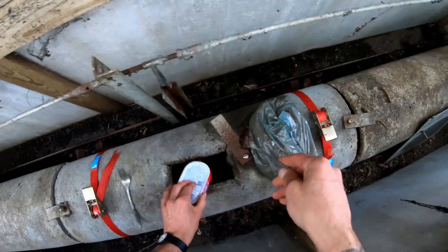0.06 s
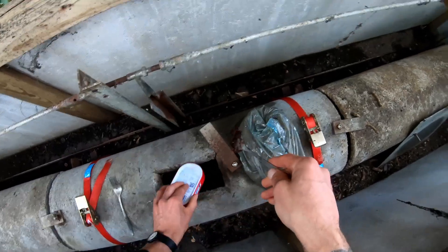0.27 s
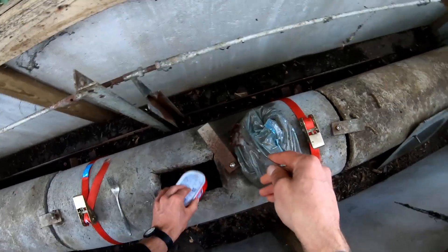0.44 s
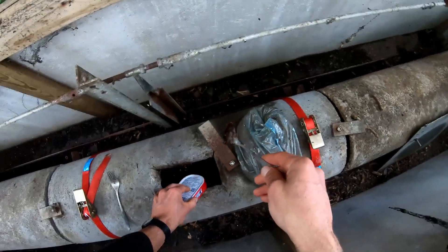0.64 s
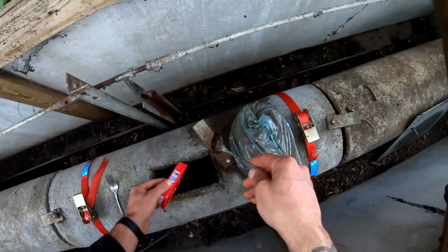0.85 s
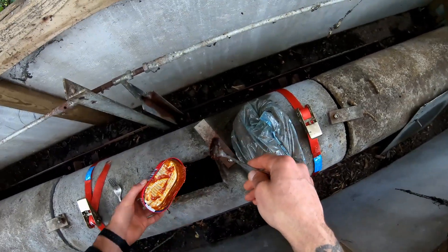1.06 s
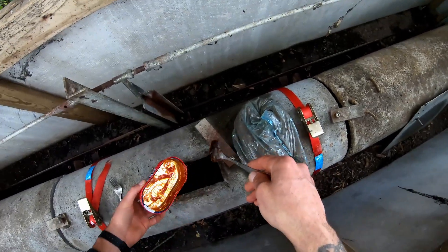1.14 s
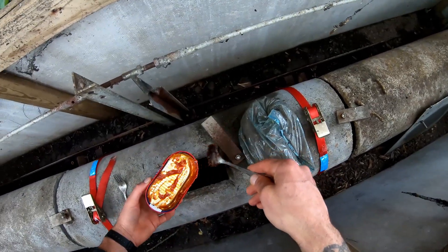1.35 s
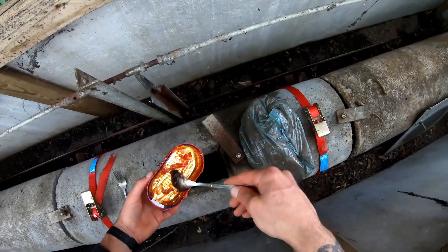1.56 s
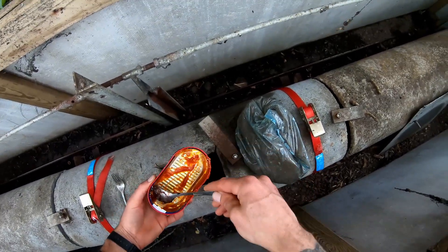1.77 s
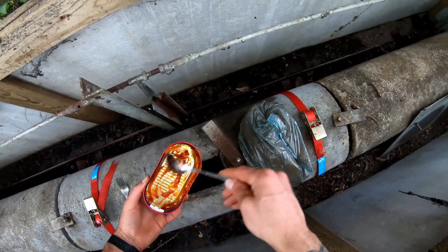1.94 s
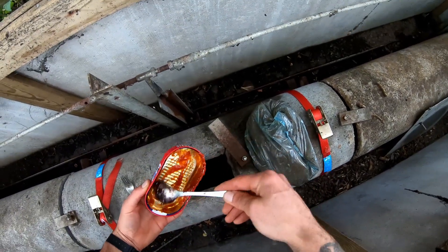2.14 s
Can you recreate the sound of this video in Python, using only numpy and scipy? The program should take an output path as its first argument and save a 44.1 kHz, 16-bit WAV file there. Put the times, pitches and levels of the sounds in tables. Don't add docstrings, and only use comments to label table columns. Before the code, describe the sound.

An empty metal tin knocks four times on a hollow pipe, then a spoon scrapes it

```python
import sys
import numpy as np
from scipy import signal
from scipy.fft import rfft, irfft
from scipy.io import wavfile
from scipy.ndimage import uniform_filter1d

SR = 44100
rng = np.random.default_rng(int(sys.argv[2]) if len(sys.argv) > 2 else 0)


def invert_db(x):
    u = np.asarray(x, float) / 20
    return 10 ** u


def transcribe(signal):
    frames = np.atleast_2d(signal).T
    limited = np.clip(frames, -1, 1)
    pcm = np.round(limited * 32767).astype(np.int16)
    wavfile.write(sys.argv[1], SR, pcm)


N = 97020

# start in seconds, rib level in dB, bowl level in dB.
RIB_DROPS = [(1.8427, -32.5, -34.5), (1.8534, -27.5, -38), (1.8623, -26, -36), (1.8704, -27.5, -38),
             (1.8781, -28.5, -31), (1.8857, -27, -40), (1.8928, -23, -31), (1.8985, -26, -28.5),
             (1.9042, -17, -20), (1.9097, -34, -22.5), (1.915, -23, -29), (1.9203, -38, -31),
             (1.926, -41, -36), (1.933, -36, -30.5), (1.938, -43, -35), (1.9424, -46, -48),
             (1.949, -50, -55)]


def evened(x):
    return x / np.sqrt(np.mean(x ** 2) + 1e-20)


def read(points, hz):
    f, value = np.transpose(points)
    return np.interp(np.log(hz + 1), np.log(f + 1), value)


def add(mix, s, sound):
    at = round(s * SR)
    sound = sound[max(-at, 0):]
    part = mix[max(at, 0):][:len(sound)]
    part += sound[:len(part)]


def coloured(x, points):
    hz = np.fft.rfftfreq(len(x), 1 / SR)
    below = hz < 0.7 * points[0][0]
    gain = invert_db(read(points, hz) - 60 * below)
    return evened(irfft(rfft(x) * gain, len(x)))


def ring(modes, t):
    hz, db, t60 = np.transpose(modes)[:, :, None]
    level = invert_db(db - 60 * t / np.maximum(t60, 0.003))
    return (level * np.sin(2 * np.pi * hz * t)).sum(0)


def onset(t, rise_s):
    return np.minimum(t / rise_s, 1)


def stilled(t, gap, fall_s):
    return np.exp(-np.maximum(t - gap, 0) / fall_s)


def hiss():
    # frequency in Hz, level in dB.
    hiss_colour = [(100, -0.5), (370, -1), (600, -6), (1600, -14), (5000, -15.5), (9000, -17.5),
                   (13000, -21), (16500, -35)]
    a, b, patches = rng.standard_normal((N // 256 + 5, 513, 3)).T
    patches = uniform_filter1d(patches, size=10, axis=0)
    patches = evened(uniform_filter1d(patches, size=10, axis=1))
    noise = signal.istft((a + 1j * b) * invert_db(patches), nperseg=1024, noverlap=768)[1][:N]
    return invert_db(-55.5) * coloured(noise, hiss_colour)


def wind():
    # time in seconds, level in dB.
    gusts = [(0.0, -32.5), (0.02, -40.5), (0.21, -48.5), (0.37, -45.5), (0.48, -46.5), (0.62, -43.5),
             (0.69, -51), (1.3, -47), (1.33, -56), (1.6, -43), (1.65, -55), (1.71, -43.5), (1.87, -45),
             (1.94, -35.5), (2.02, -54.5), (2.2, -34)]
    # frequency in Hz, level in dB.
    wind_colour = [(7.1, -38), (12, 7), (56, -1.5), (182, -21.5), (221, -40), (248, -38), (600, -31.5),
                   (780, -77), (1320, -120)]
    s, db = np.transpose(gusts)
    strength = uniform_filter1d(np.interp(np.arange(N) / SR, s, db), size=3000)
    return coloured(rng.standard_normal(N), wind_colour) * invert_db(strength)


def yard(x):
    echo_t60 = 0.15
    taps = np.zeros(SR // 4)
    at = np.arange(120, SR // 4 - 20, 20)
    taps[at + rng.integers(0, 20, len(at))] = rng.choice([-1., 1.], len(at))
    decay = invert_db(-60 * np.arange(SR // 4) / SR / echo_t60)
    taps = signal.lfilter([1], [1, -0.5], taps * decay)
    return signal.fftconvolve(x, taps / np.linalg.norm(taps))[:N]


def slides():
    # start in seconds, length in seconds, level in dB, centre in Hz.
    brushes = [
        (-.05, 0.24, -49.5, 368),
        (0.236, .01, -49, 1500),
        (0.238, 0.026, -47, 4880),
        (1.661, 0.053, -52, 2530),
        (1.761, 0.25, -55, 1750),
        (1.96, 0.098, -60.5, 1480),
    ]
    out, t = np.zeros(N), np.arange(8000) / SR
    for s, length, db, hz in brushes:
        a, b = rng.standard_normal((2, 8000))
        grains = a * invert_db(13.0 * uniform_filter1d(b, size=60))
        grains = coloured(grains, [(hz / 5, -14), (hz, 0), (hz * 5, -15), (22000, -30)])
        stroke = np.sin(np.pi * onset(t, length) ** 0.39)
        add(out, s, invert_db(db) * grains * stroke)
    return out


def grit():
    # frequency in Hz, level in dB.
    grit_colour = [(530, -55), (900, -15), (1700, -1), (2400, -4), (3470, -10), (4520, -15.5), (11000, -16),
                   (16000, -17)]
    grain_db = 9 * uniform_filter1d(rng.standard_normal(N), size=30)
    return coloured(rng.standard_normal(N) * invert_db(grain_db), grit_colour)


def spoon_tap(rough):
    # frequency in Hz, level in dB, t60 in seconds.
    held_modes = [(460, -1, 0.028), (944, -10, 0.04), (1408, 2, 0.04), (1660, -1, 0.035), (2300, -3, 0.022),
                  (2912, 4, 0.028), (3620, -7, .03), (4500, -4, .014), (5250, 0, 0.016), (5980, -16, .025),
                  (8000, -16, .02), (8570, -16, .02)]
    tap_s, tap_db, fizz_db = 1.6538, -22.5, -6
    out, t = np.zeros(N), np.arange(3000) / SR
    tap = invert_db(tap_db - 7.5) * ring(held_modes, t) * onset(t, 0.0021)
    fizz = invert_db(tap_db + fizz_db - 60 * t / 0.037 - 3) * onset(t, 0.00068) * rough[:3000]
    add(out, tap_s, tap + fizz)
    add(out, 1.665, invert_db(-16) * tap)
    return out


def rib_ticks():
    # frequency in Hz, level in dB, t60 in seconds.
    rib_modes = [(1240, -7, 0.03), (1390, 2, 0.07), (1620, -8, .04), (430, -9, 0.05), (8700, -19, .015),
                 (10600, -21, .015)]
    # frequency in Hz, level in dB, t60 in seconds.
    bowl_modes = [(172, -12, 0.043), (371, -3, 0.039), (700, -6.5, 0.027), (932, -10.5, 0.048),
                  (2270, -1.5, 0.027), (2917, -6.5, 0.032), (1844, -7, 0.033)]
    out, t = np.zeros(N), np.arange(3000) / SR
    soft = 1 - np.exp(-t / 0.00076)
    gaps = np.diff([row[0] for row in RIB_DROPS], append=2)
    for (s, rib_db, bowl_db), gap in zip(RIB_DROPS, gaps):
        rib = stilled(t, gap, 0.0008) * invert_db(rib_db) * ring(rib_modes, t)
        add(out, s, soft * (rib + invert_db(bowl_db) * ring(bowl_modes, t)))
    return out


def rib_scrape(rough):
    # time in seconds, grit level in dB.
    pressure = [
        (1.84, -53),
        (1.853, -40.5),
        (1.874, -38),
        (1.889, -33.5),
        (1.904, -27.5),
        (1.918, -26),
        (1.933, -35.5),
        (1.943, -41),
        (1.962, -69),
    ]
    out = np.zeros(N)
    s, db = np.transpose(pressure)
    time = np.arange(s[0], s[-1], 1 / SR)
    drops = np.array([row[0] for row in RIB_DROPS])
    last = np.maximum(np.searchsorted(drops, time) - 1, 0)
    flare = np.exp(-abs(time - drops[last]) / 0.002)
    level = invert_db(np.interp(time, s, db))
    add(out, s[0], (0.7 + flare) * level * rough[9000:][:len(time)])
    return out


def spoon():
    rough = grit()
    return spoon_tap(rough) + rib_ticks() + rib_scrape(rough)


def pipe_hums():
    # frequency in Hz, level in dB, t60 in seconds.
    pipe_modes = [(185, -35, .4), (275, -34, .1)]
    # start in seconds, level in dB, length in seconds.
    hums = [
        (.114, 4.5, 0.11),
        (.279, -2.5, 0.15),
        (.426, 1.5, 0.12),
        (.538, 0.5, 0.14),
    ]
    out, t = np.zeros(N), np.arange(SR // 5) / SR
    hum = ring(pipe_modes, t) * onset(t, 0.0033)
    for s, db, length in hums:
        add(out, s, invert_db(db) * hum * np.clip((length - t) / 0.018, 0, 1))
    return out


def thuds():
    # start in seconds, level in dB, frequency in Hz.
    landings = [
        (.127, -18.5, 545),
        (.299, -28.5, 460),
        (0.443, -22.5, 460),
        (.555, -16, 580),
    ]
    out, t = np.zeros(N), np.arange(SR // 5) / SR
    t60 = 0.031
    for s, db, hz in landings:
        thud = ring([(hz, db, t60), (hz * 1.07, db - 11, t60)], t)
        add(out, s, thud * onset(t, 0.0026))
    return out


def singing_lines():
    # frequency in Hz, level in dB, t60 in seconds.
    first_set = [(1326, 0, .4), (1832, 0, .45), (1120, -4, .3)]
    second_set = [(1392, -3, .4), (1676, 0, .35)]
    low_set = [(810, 0, 1.)]
    # start in seconds, then the first, second and low set in dB.
    wakings = [
        (.114, -40, -50, -60),
        (.279, -46, -41, -45),
        (.426, -51, -38, -47),
        (.538, -56, -47, -50),
    ]
    out, t = np.zeros(N), np.arange(SR // 4) / SR
    gaps = np.diff([row[0] for row in wakings], append=1)
    for (s, *levels), gap in zip(wakings, gaps):
        sets = zip(levels, (first_set, second_set, low_set))
        lines = sum(invert_db(db) * ring(modes, t) for db, modes in sets)
        add(out, s, lines * onset(t, 0.0015) * stilled(t, gap, 0.0022))
    return out


def struck_patches():
    # start in seconds, level in dB, frequency in Hz, t60 in seconds.
    patch_blows = [(.1137, -11.5, 1077, .03), (0.1135, -12.5, 1230, 0.025), (0.1152, -18, 1710, 0.039),
                   (.1145, -18, 1927, 0.039), (0.1138, -10, 4020, .015), (.116, -22, 2270, 0.036),
                   (0.118, -20.5, 2800, 0.043), (.117, -22.5, 3290, 0.045), (.129, -24, 1134, .04),
                   (.131, -19.5, 1517, 0.034), (.2785, -12.5, 1134, 0.029), (.2785, -16.5, 2193, 0.054),
                   (.2795, -19, 2055, .045), (0.2781, -25, 280, .05), (.281, -16, 1692, 0.057),
                   (.540, -18.5, 1677, 0.052), (.301, -15, 1746, 0.028), (0.425, -25, 318, 0.054),
                   (.4247, -26.5, 630, 0.038), (.445, -21, 1090, 0.049), (.538, -26, 645, 0.043),
                   (.572, -28.5, 1410, 0.06)]
    out, t = np.zeros(N), np.arange(SR // 4) / SR
    for s, db, hz, t60 in patch_blows:
        add(out, s, onset(t, 0.0006) * ring([(hz, db, t60)], t))
    return out


def side_wall():
    wall_hz = [3760, 4340, 5420, 6230, 6700, 7000, 7220, 8080, 8770, 10050, 11000, 11650]
    # level in dB, t60 in seconds.
    wall_modes = [(0, .034), (-2, .036), (-2, .03), (-5, .024), (-3, .026), (-6, .024), (-7, .03),
                  (-2, .026), (-5, .024), (-8, .024), (-10, .02), (-11, .02)]
    # start in seconds, level in dB, lowest mode in dB, second mode in dB.
    wall_blows = [
        (.1137, -27, -3, 0),
        (.1285, -33, -3, 0),
        (.2785, -21, 2, -5),
        (.2976, -32, -3, 0),
        (.4250, -19, -3, 1),
        (.5380, -25, -2, 1),
    ]
    out, t = np.zeros(N), np.arange(SR // 4) / SR
    for s, db, first_db, second_db in wall_blows:
        woken = np.r_[first_db, second_db, 2 * rng.standard_normal(len(wall_modes) - 2)]
        modes = np.c_[wall_hz, wall_modes] + np.outer(woken, [0, 1, 0])
        add(out, s, invert_db(db) * onset(t, 0.0006) * ring(modes, t))
    return out


def clatter(bright_db, t):
    # frequency in Hz, level in dB.
    sheet_colour = [(200, -3.5), (760, -10), (1050, -2.5), (1480, -5), (1950, -2), (3800, -5), (7000, -7.5),
                    (16000, -14)]
    # frequency in Hz, t60 in seconds.
    sheet_t60 = [(200, 0.065), (1000, 0.17), (3000, 0.095), (8000, 0.085), (16000, 0.086)]
    crack_db, crack_s = -6.5, 0.008
    hz = np.fft.rfftfreq(len(t), 1 / SR)
    mids = np.geomspace(200, 16000, num=12)[:, None]
    distance = abs(np.log(hz + 1) - np.log(mids)) / np.log(mids[1] / mids[0])
    bands = np.maximum(1 - distance, 0)
    gain = invert_db(read(sheet_colour, hz) + bright_db * np.log2(np.maximum(hz / 1000, 1)))
    noise = irfft(rfft(rng.standard_normal(len(t))) * gain * bands, len(t))
    crack = 1 + invert_db(crack_db + 3.1 * np.log2(mids / 2000)) * np.exp(-(t / crack_s) ** 3)
    decay = invert_db(-60 * t / read(sheet_t60, mids))
    return (noise * crack * decay).sum(0) * onset(t, 0.00022)


def rattle():
    length_s, touches_per_s = 0.00036, 2900
    t = np.arange(600) / SR
    u, v = rng.random((2, 600))
    hits = (u < touches_per_s / SR) * (2 * v - 1) * np.exp(-t / length_s)
    hits[0] = 0.49
    return hits / np.linalg.norm(hits)


def knocks():
    # start in seconds, force in dB, base panel in dB, rim panel in dB,
    # brightness in dB per octave above 1 kHz.
    contacts = [(-.06, -14.5, 7, 8, 3), (0.114, -9, -19.5, -11, -0.5), (0.129, -14, 4, 3, -3),
                (.139, -22, -12, 2, -4), (0.2326, -38, 1.5, 2, -3), (0.2783, -11, -8, 9.5, 0),
                (0.2976, -20.5, -6, -10, -2.5), (0.3019, -17, -0.5, 3, -4), (0.4250, -13.5, 5, 13, 1),
                (.4460, -17, -3.5, 1, -5), (.5381, -17, -2.5, 12.5, -.5), (0.557, -19.5, 3, -3, -3.5),
                (0.568, -23.5, -9, -8, -8.5)]
    # frequency in Hz, level in dB, t60 in seconds.
    base_modes = [(911, -4.5, 0.12), (1038, -1.5, 0.075), (1103, 3.5, 0.069), (1162.6, 4, 0.062),
                  (1205, 0.5, 0.04), (1480, -15.5, 0.044)]
    rim_hz = [1674, 1819, 2047, 2247, 2545, 2735, 2900]
    # level in dB, t60 in seconds.
    rim_modes = [(7, 0.036), (-5, 0.065), (-2, 0.033), (-8.5, 0.041), (-21, 0.011), (-9.5, 0.046),
                 (-10, 0.057)]
    sheet_db = -6.5
    out, t = np.zeros(N), np.arange(SR // 5) / SR
    base = ring(base_modes, t) * onset(t, 0.0023)
    rim = ring(np.c_[rim_hz, rim_modes], t) * (1 - np.exp(-t / 0.0028))
    gaps = np.diff([row[0] for row in contacts], append=1)
    for (s, db, base_db, rim_db, bright_db), gap in zip(contacts, gaps):
        rattled = signal.fftconvolve(invert_db(base_db) * base, rattle())[:len(t)]
        panels = rattled + invert_db(rim_db) * rim
        add(out, s, invert_db(db - 10) * panels * stilled(t, gap, 0.0022))
        add(out, s, invert_db(db + sheet_db + 9) * clatter(bright_db, t))
    return out


def scene():
    tin = knocks() + side_wall() + struck_patches() + singing_lines() + thuds()
    metal = tin + pipe_hums() + spoon() + slides()
    return (metal + invert_db(-16.5) * yard(metal) + hiss() + wind())[None]


def low_pass(x):
    return signal.sosfilt(signal.butter(12, 16820, fs=SR, output="sos"), x)


def record(dry):
    # centre in seconds, length in seconds, lower edge in Hz.
    treble_dips = [
        (1.807, 0.014, 6040),
        (2.165, 0.014, 1210),
    ]
    edge = signal.firwin(255, 15800, window=("kaiser", 8), fs=SR)[None]
    x = signal.oaconvolve(np.tanh(dry / 1.122) * 1.265, edge, "same")
    t = np.arange(N) / SR
    for s, length, hz in treble_dips:
        treble = signal.sosfiltfilt(signal.butter(2, hz, "high", fs=SR, output="sos"), x)
        x = x - 0.8 * treble * np.exp(-(2 * (t - s) / length) ** 4)
    return low_pass(x)


dry = scene()
out = record(dry)
transcribe(out)
```